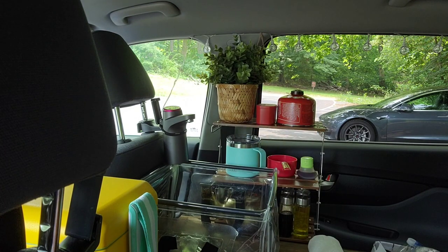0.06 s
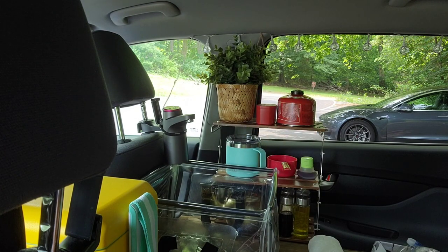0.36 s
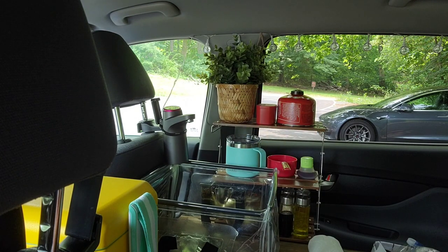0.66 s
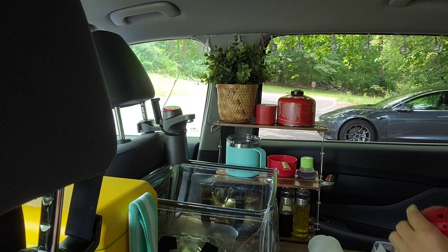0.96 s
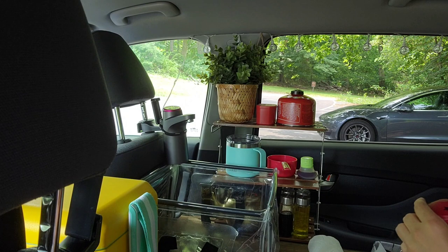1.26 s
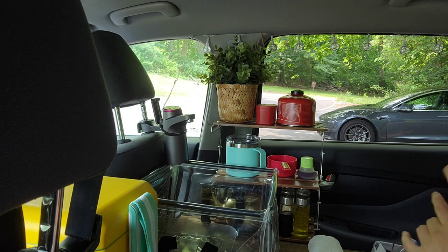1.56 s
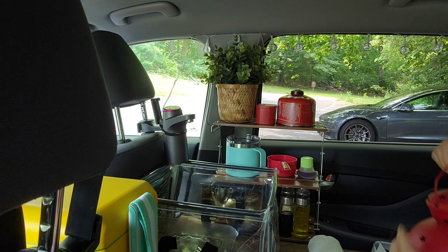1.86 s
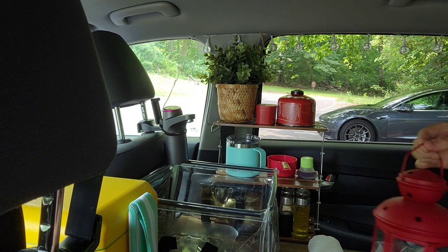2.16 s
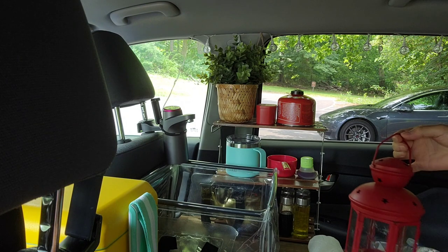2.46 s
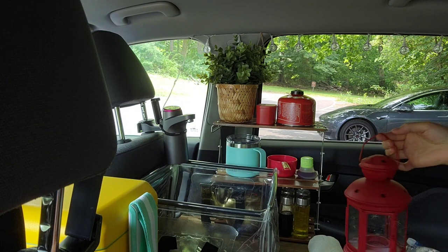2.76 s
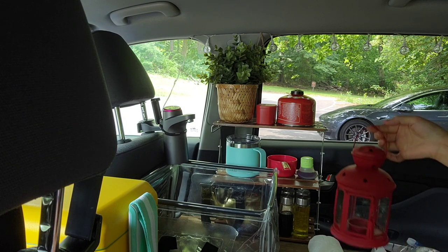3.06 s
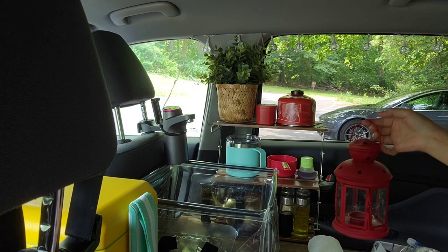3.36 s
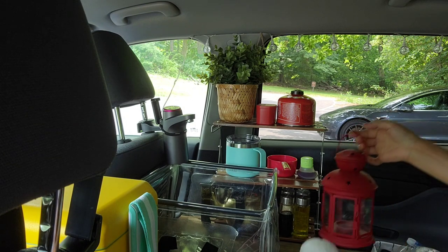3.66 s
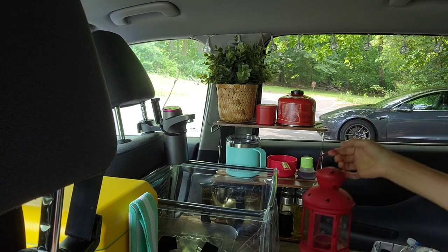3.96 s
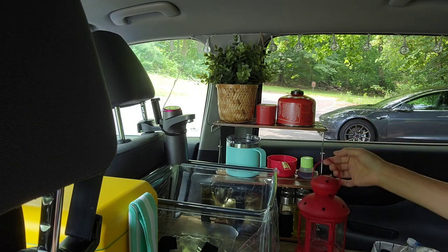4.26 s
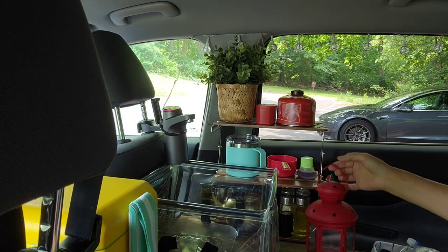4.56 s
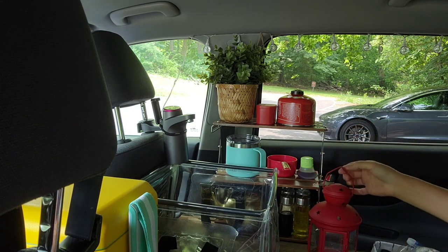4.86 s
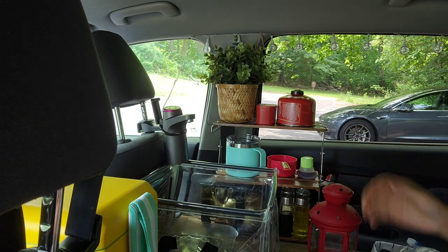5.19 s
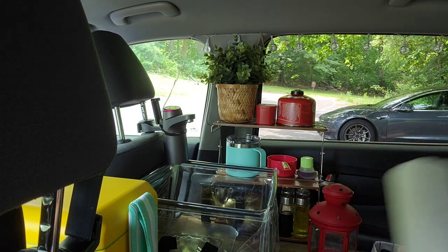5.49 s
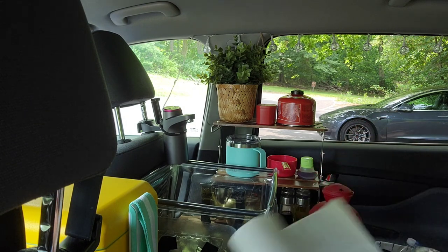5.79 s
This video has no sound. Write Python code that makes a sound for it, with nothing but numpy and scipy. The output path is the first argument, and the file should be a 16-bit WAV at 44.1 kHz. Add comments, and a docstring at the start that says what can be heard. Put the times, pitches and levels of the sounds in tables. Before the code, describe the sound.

Inside a quietly rumbling parked car, a small metal lantern clinks, is set down with knocks, its wire handle drops, and paper rustles.

```python
"""Soft clinks of tin and glass over the low rumble of a parked car: a small lantern is picked up by its
wire handle, which slides in its eyelets and sets body and panes ringing. The lantern bumps a wooden
shelf, rubs past the things on it and is set down with a knock and a boom. The handle is let go, clacks
onto the tin and bounces. Last, a paper roll is brought in with a dry swish."""
import sys
import numpy as np
from scipy import signal
from scipy.fft import rfft, irfft
from scipy.io import wavfile
from scipy.ndimage import uniform_filter1d

SR = 44100
rng = np.random.default_rng(int(sys.argv[2]) if len(sys.argv) > 2 else 0)


def to_wav(sig):
    """Store sig (one row per channel, or 1-D mono) as 16-bit WAV at the path in sys.argv[1].

    Samples outside -1..1 are clipped; the rate is SR.
    """
    pcm = np.clip(np.atleast_2d(sig), -1, 1) * 32767
    pcm = np.round(pcm).astype(np.int16)
    wavfile.write(sys.argv[1], SR, pcm.T)  # frames by channels


N = 265923
TIME = np.arange(N) / SR
RING_TIME = np.arange(SR // 2) / SR  # time axis of one hit
LAG_S = 0.0002233  # the right channel trails the left
# the lantern's modes: f/Hz, level/dB, t60/s at ring length 1
LANTERN_MODES = [(540, -15, .1), (678, -14, .13), (795, -9, .09), (1028, -17, .15), (1100, -14, .1),
                 (1355, -3, .08), (1443, -7, .07), (1606, -12, .24), (1700, -16, .1), (3300, -18, .06),
                 (3900, -4, .06), (4370, -9, .09), (4530, -4, .05), (5690, 3, .055), (5800, 1, .07),
                 (5916, -2, .075), (6208, 4, .065), (6436, 3, .05), (6840, 0, .055), (7186, -1, .055),
                 (7515, 1, .06), (7986, -1, .055), (8170, -4, .045), (9540, 2, .055), (9705, -1, .06),
                 (9910, -3, .06), (10628, -1, .05), (11700, 2, .045), (12230, -1, .055), (15550, 2, .045)]


def undb(db):
    """Decibels to gain."""
    return 10 ** (np.asarray(db) / 20)


def unit(x):
    """Scale to rms 1."""
    return x / np.sqrt(np.mean(x ** 2))


def at_level(x, db):
    """Give a stereo hit the energy of 40 ms at this level."""
    return x * undb(db) / np.sqrt(np.sum(x ** 2) / (2 * .04 * SR))


def add(out, s, sound):
    """Mix a sound in at time s."""
    i = max(int(s * SR), 0)
    out[:, i:i + sound.shape[1]] += sound[:, :N - i]


def colour(x, points, share=1):
    """EQ through (f/Hz, gain/dB) points joined on a log-frequency axis."""
    hz, db = np.transpose(points)
    f = np.maximum(np.fft.rfftfreq(x.shape[-1], 1 / SR), 1)
    curve_db = np.interp(np.log(f), np.log(hz), db)
    return irfft(rfft(x) * undb(share * curve_db), x.shape[-1])


def cluster(x, ripple_db, step_hz=110, count=199):
    """Small resonances bunch up unevenly over frequency."""
    hz = np.arange(1, count + 1) * step_hz
    return colour(x, np.column_stack([hz, ripple_db * rng.uniform(-0.82, 1, count)]))


def split(x, low_hz, high_hz):
    """Lows, mids and highs of a sound."""
    bands = [(low_hz, "lowpass"), ([low_hz, high_hz], "bandpass"), (high_hz, "highpass")]
    return [signal.sosfilt(signal.butter(4, hz, kind, fs=SR, output="sos"), x) for hz, kind in bands]


def resonate(x, hz, width_hz):
    """One resonance with gain 1 at its centre."""
    return signal.lfilter(*signal.iirpeak(hz, hz / width_hz, fs=SR), x)


def stereo_noise(size, alike_hz=900):
    """Noise with shared bass and treble scattered wide by the cabin; it reaches the left first."""
    f = np.fft.rfftfreq(size, 1 / SR)
    mid, side = rfft(rng.standard_normal((2, size)))
    width = np.pi / 4 * np.clip(1.146 * f / (f + alike_hz), 0, 1)
    mid, side = mid * np.cos(width), side * np.sin(width)
    delay = np.exp(-2j * np.pi * f * LAG_S)
    return irfft(np.array([mid + side, (mid - side) * delay]), size)


def drift(rate_hz):
    """Random wander with a spread near 1."""
    hold = max(int(SR / rate_hz), 1)
    steps = np.repeat(rng.standard_normal(N // hold + 1), hold)
    return unit(uniform_filter1d(steps, hold))[:N]


def attack(rise_s):
    """A hit swells for a moment as contacts and first reflections pile up."""
    return 1 - np.exp(-(RING_TIME / rise_s) ** 2)


def decay(t60):
    """Exponential tail, 60 dB down after t60 seconds."""
    return np.exp(-np.log(1000) * RING_TIME / t60)


def ring(modes, length=1, turn_rad=3.6, scatter_db=2.1, diffuse_hz=3000):
    """Struck modes; low ones reach the left first, reflections turn the phase of the high ones."""
    out = 0
    for hz, db, t60 in modes:
        strength, start, turn = rng.standard_normal(3)
        diffuse = min((hz / diffuse_hz) ** 2, 1)
        apart = diffuse * turn_rad * turn + (1 - diffuse) * 2 * np.pi * hz * LAG_S
        phase = diffuse * start - np.array([[0], [apart]])
        tone = np.sin(2 * np.pi * hz * RING_TIME + phase)
        out = out + undb(db + scatter_db * strength) * decay(t60 * length) * tone
    return out


def crash(spectrum, low_t60, mid_t60, high_t60):
    """Countless overlapping resonances and cabin reflections, each band fading at its own rate."""
    wash = cluster(colour(stereo_noise(len(RING_TIME)), spectrum), ripple_db=12)
    bands = split(wash, 2500, 8000)
    return sum(band * decay(t60) for band, t60 in zip(bands, (low_t60, mid_t60, high_t60)))


def pressure(strokes):
    """Each stroke swells by 20 dB over its rise time and loses 20 dB over its fall time."""
    gains = [undb(db - 20 * np.where(TIME < s, ((s - TIME) / rise_s) ** 2, (TIME - s) / fall_s))
             for s, db, rise_s, fall_s in strokes]
    return np.max(gains, axis=0)


def friction(strokes, spectrum, grain_db):
    """Tiny slips, dense and uneven, following the pressure of the stroke."""
    slips = stereo_noise(N) * undb(grain_db * drift(500) + 1.8 * drift(43))
    return unit(colour(slips, spectrum)) * pressure(strokes)


def cabin_rumble(rumble_db=-57, boom_db=-63):
    """Outdoor rumble comes through the car body, and the cabin's lowest air mode booms beneath it."""
    # rumble inside the car: f/Hz, level/dB
    spectrum = [(12, -36.5), (20, -11.5), (77, 0.5), (93, -5), (110, -22.5), (204, -19), (255, -26.5),
                (377, -18), (472, -27), (558, -26), (923, -41.5), (1330, -41.5), (2750, -46), (5850, -53),
                (16000, -80.5)]
    rumble = unit(colour(stereo_noise(N, alike_hz=500), spectrum)) * undb(rumble_db + 0.36 * drift(2.7))
    drive = colour(stereo_noise(N), [(100, -11.5), (400, -11)])
    boom = resonate(drive, hz=72, width_hz=14)
    return rumble + unit(boom) * undb(boom_db)


def handle_slide(sing_db=17, hiss_db=-3):
    """Wire sliding in its eyelets hisses and keeps the tin ringing."""
    # strokes of the wire: peak t/s, level/dB, rise/s, fall/s
    slides = [(.07, -70.5, 0.088, 0.12), (1.98, -57, 0.13, .04), (2.8, -78, 0.04, .07)]
    # modes that the wire sets singing: f/Hz, width/Hz, level/dB
    singing_modes = [(1595, 6.1, 3), (4100, 32, -6), (5230, 34, -9), (5790, 45, -7.5), (6200, 40, -7.5),
                     (7660, 31, -11), (8000, 32, -17)]
    hiss_spectrum = [(300, -14), (750, 2.5), (1600, 0), (2000, -15), (3200, -12.5), (4800, -6.5),
                     (6000, -2.5), (8500, -0.5), (15500, -6.5)]  # f/Hz, level/dB
    slips = friction(slides, hiss_spectrum, grain_db=1.4)
    singing = sum(undb(db) * resonate(slips, hz, width_hz) for hz, width_hz, db in singing_modes)
    return undb(sing_db) * singing + undb(hiss_db) * slips


def tin_hit(levels_db, length, spot_hz, rise_s, clash_db=-3, spot_db=-6):
    """One contact rings body, panes and bright edge at three levels; the struck spot adds a short note."""
    # the lantern's dense, short-lived resonances: f/Hz, level/dB
    clash_spectrum = [(150, -4.5), (400, 0.5), (750, -8), (1000, -6), (1400, 0), (1900, -7.5), (2800, -21),
                      (3480, -17), (4000, .5), (4700, 3.5), (6200, -0.5), (8800, -5.5), (13000, 3),
                      (15500, -12)]
    panes_hz, edge_hz = 2600, 7820  # crossovers
    clash = crash(clash_spectrum, 0.17 * length, 0.1 * length, 0.1 * length)
    hit = (at_level(ring(LANTERN_MODES, length), 0) + at_level(clash, clash_db)) * attack(rise_s)
    note = ring([(spot_hz, 0, 0.093)], length, turn_rad=1.2, diffuse_hz=2200) * attack(rise_s)
    note_db = spot_db + (levels_db[0] if spot_hz < panes_hz else levels_db[1])
    bands = split(hit, panes_hz, edge_hz)
    return sum(at_level(band, db) for band, db in zip(bands, levels_db)) + at_level(note, note_db)


def lantern_clinks(rise_s=.0035, click_db=-16, click_t60=.07):
    """Handle and panes strike the tin, loose panes fall back and tick, and the wire snaps taut."""
    # contacts: t/s, body level/dB, panes over body/dB, edge over panes/dB, spot f/Hz
    clinks = [(0.106, -59.5, 5.5, 3, 4370), (0.407, -65, -22, -18, 880), (0.448, -71.5, 5, -5.5, 3880),
              (1.359, -56, 1.5, -17, 1280), (1.38, -56.5, 11.5, -7.5, 6040), (1.454, -63, 2, -16, 4340),
              (1.6, -68, -22, -9, 675), (1.656, -65, -3, -2.5, 1350), (1.709, -66, -10, -8.5, 1350),
              (1.755, -61, -12.5, -6, 760), (2.194, -60.5, 0, 5.5, 777), (2.287, -68, -15, -25, 765),
              (2.423, -76.5, 0.5, -16, 674), (3.439, -48.5, -13, -24, 2066), (3.669, -60.5, 0, -8, 1430),
              (3.731, -74.5, 9, -8, 1380), (4.658, -38, -20.5, -0.5, 2240), (4.821, -51.5, 6, -8, 785),
              (4.88, -54.5, -7, -34, 1093), (4.974, -62, -13.5, -22, 804), (4.997, -48, -1.5, -16, 5770)]
    # dry click of a pane in its frame: f/Hz, level/dB
    click_spectrum = [(1500, -21.5), (2600, -3.5), (3200, 0.5), (4200, -15), (8000, -40)]
    # modes of the taut handle: f/Hz, level/dB, t60/s
    wire_modes = [(689, -12, .14), (740, -11, .1), (3100, -22, .1), (3480, -28, .08), (4506, -13, .2),
                  (4667, -8, .19), (4753, -16, .2), (4867, -9, .15), (5040, 0, .19), (5146, -12, .19),
                  (5276, -12, .14), (5453, 0, .06), (5520, -2, .05), (6309, -19, .17), (6700, -6, .06),
                  (7640, -9, .08)]
    firm_db, halving_db = -56, 27  # firmer contacts damp the ring
    rebound_s, rebound_loss_db = .036, (15.5, 26.5, 37.5)  # a pane falls back softer and duller
    out = np.zeros((2, N))
    for s, body_db, pane_db, edge_db, spot_hz in clinks:
        levels_db = np.cumsum([body_db, pane_db, edge_db])
        length = 2 ** ((firm_db - levels_db.max()) / halving_db)
        add(out, s, tin_hit(levels_db, length, spot_hz, rise_s))
        click = crash(click_spectrum, click_t60, click_t60, click_t60) * attack(rise_s)
        add(out, s, at_level(click, levels_db[1] + click_db))
        fall_back_s = s + rebound_s * rng.uniform(.7, 1.3)
        add(out, fall_back_s, tin_hit(levels_db - rebound_loss_db, length, spot_hz, rise_s))
    for s in rng.uniform(1.28, 2.12, 5):  # faint ticks during the lift
        add(out, s, tin_hit((-75.5, -82, -100), length=1.7, spot_hz=740, rise_s=rise_s))
    ping = ring(wire_modes, turn_rad=1.0) * attack(0.0022)
    add(out, 2.194, at_level(ping, db=-40))
    return out


def shelf_knocks(thud_db=-8, tick_db=-14, contacts=3):
    """The base lands rim first and rocks flat; the board knocks, then booms under the weight."""
    # landings: t/s, boom level/dB, knock level/dB, rocking gap/s, ring length factor, pitch factor
    landings = [(3.438, -38.5, -56.5, .029, 0.81, 1.12), (4.659, -35, -35.5, 0.011, 0.58, 0.99),
                (4.6805, -30, -53.5, .009, 1.08, 1.02), (4.817, -36.5, -43, .028, 0.67, 0.93)]
    # the board's modes before a landing's factors: f/Hz, level/dB, t60/s
    board_modes = [(72, -16, .2), (104, 3, .2), (145, -6, .11), (180, -6, .13), (230, -8, .14),
                   (323, -18, .12), (470, -9, .07), (571, -7, .12), (662, -3, .075), (770, -9, .1),
                   (1100, -14, .09), (1210, -15, .1), (1320, -12, .08), (1570, -16, .07), (1690, -20, .1),
                   (2100, -20, .07), (2290, -15, .04)]
    # wooden thud: f/Hz, level/dB
    thud_spectrum = [(60, 3.5), (150, 11.5), (300, -6), (470, 2), (700, 5.5), (950, -11), (1400, -3),
                     (1900, -16.5), (2300, -15), (3000, -29), (6000, -29.5), (15500, -45)]
    loss_db_per_s = np.array([117, 450, 690])  # boom, knock, tick: the treble dies first
    out = np.zeros((2, N))
    for s, boom_db, knock_db, gap_s, length, pitch in landings:
        modes = [(hz * pitch, db, t60) for hz, db, t60 in board_modes]
        for late_s in gap_s * np.arange(contacts):
            thud = crash(thud_spectrum, 0.16 * length, 0.23 * length, 0.18 * length)
            hit = (at_level(ring(modes, length), 0) + at_level(thud, thud_db)) * attack(.002)
            bands = split(hit, 320, 3200)
            levels_db = np.array([boom_db, knock_db, knock_db + tick_db]) - late_s * loss_db_per_s
            add(out, s + late_s, sum(at_level(band, db) for band, db in zip(bands, levels_db)))
    return out


def brushing(strokes, rasp_db):
    """Dry surfaces drag over each other; the slips stir hollow resonances that come and go."""
    # dry friction: f/Hz, level/dB
    spectrum = [(400, -20), (900, -13), (1450, -2.5), (1800, -9.5), (2100, -5), (2600, -13), (3100, -8.5),
                (4500, -13), (6000, -16.5), (8000, -22.5), (15500, -25)]
    # resonances of the surfaces: f/Hz, width/Hz, level/dB
    rasp_modes = [(1160, 75, -6), (1443, 170, 2.5), (2067, 260, -9), (2430, 450, -12), (3090, 255, -11),
                  (5220, 380, -7), (5960, 190, -25)]
    slips = cluster(friction(strokes, spectrum, grain_db=1.0), ripple_db=7.6)
    hollow = sum(undb(db + 3 * drift(40)) * resonate(slips, hz, width) for hz, width, db in rasp_modes)
    return .5 * slips + undb(rasp_db) * hollow


def lantern_rub():
    """The lantern rubs past the things on the shelf."""
    # strokes: peak t/s, level/dB, rise/s, fall/s
    rubs = [(3.47, -51, 0.039, .06), (3.55, -53, .06, .055), (3.64, -61.5, .03, 0.042),
            (3.74, -60.5, .06, 0.054), (3.87, -70.5, .22, .2)]
    return brushing(rubs, rasp_db=-1.5)


def handle_drop(drop_s=5.1465, flight_s=.1015, flight_share=.41, rise_s=0.0087):
    """The released handle clacks onto the tin and bounces ever lower; the longest mode sings on."""
    levels_db, loss_db = np.array([-35.5, -24.5, -20.5]), (9, 12, 15.5)  # body, panes, edge
    out = np.zeros((2, N))
    add(out, drop_s, tin_hit(levels_db, length=.5, spot_hz=1350, rise_s=rise_s))
    s = drop_s
    for bounce in range(2):
        s += flight_s * flight_share ** bounce
        levels_db -= loss_db
        add(out, s, tin_hit(levels_db, length=.7, spot_hz=790, rise_s=.0045))
    longest = max(LANTERN_MODES, key=lambda mode: mode[2])
    for s, db in ((drop_s, -45), (drop_s + flight_s, -50)):
        add(out, s, at_level(ring([longest], length=1.12) * attack(rise_s), db))
    return out


def handle_chatter(start_s=5.193, gap_s=0.034, loss_db=3):
    """In mid-bounce the handle rattles in its eyelets with light contacts that ring freely."""
    levels_db = np.array([-46, -47, -52])  # body, panes, edge
    out = np.zeros((2, N))
    for k in range(2):
        hit = tin_hit(levels_db - k * loss_db, length=1.6, spot_hz=5800, rise_s=0.0039)
        add(out, start_s + k * gap_s, hit)
    return out


def paper_swish():
    """The paper roll brushes along with a hollow rasp."""
    # strokes: peak t/s, level/dB, rise/s, fall/s
    swishes = [(5.594, -61.5, .006, .015), (5.68, -59, .1, 0.3), (5.752, -56, 0.019, 0.027),
               (5.82, -61.5, 0.0556, 0.27)]
    return brushing(swishes, rasp_db=1.0)


def scene():
    """Lantern and paper play up close; the cabin rumble lies behind them."""
    # stereo tilt of the close sounds: f/Hz, left minus right/dB
    balance = [(250, 0), (650, -2), (1300, .5), (2500, .5), (4500, .5), (6500, .5), (9500, 5), (14000, 2)]
    hits = lantern_clinks() + handle_drop() + handle_chatter() + shelf_knocks()
    left, right = hits + handle_slide() + lantern_rub() + paper_swish()
    close = np.array([colour(left, balance, .5), colour(right, balance, -.5)])
    return close + cabin_rumble()


def record(dry, top_hz=16000):
    """A steep low-pass trims the very top."""
    return signal.sosfilt(signal.ellip(10, .2, 80, top_hz, fs=SR, output="sos"), dry)


dry = scene()
out = record(dry)
to_wav(out)
```